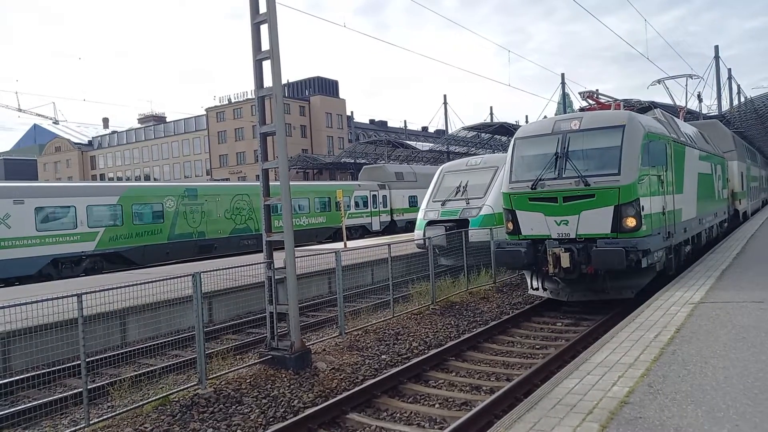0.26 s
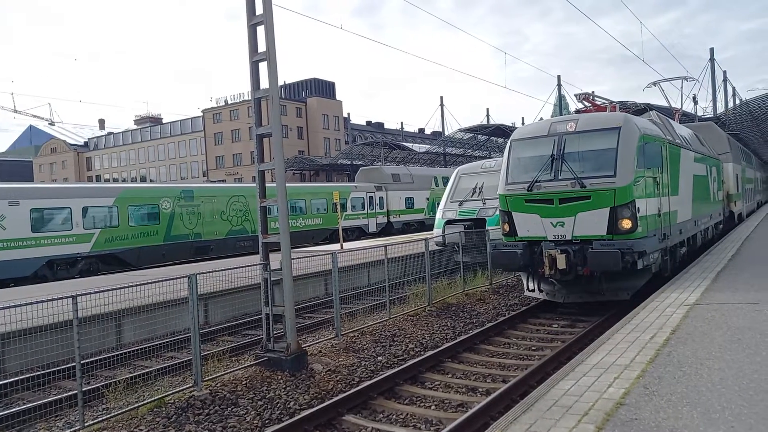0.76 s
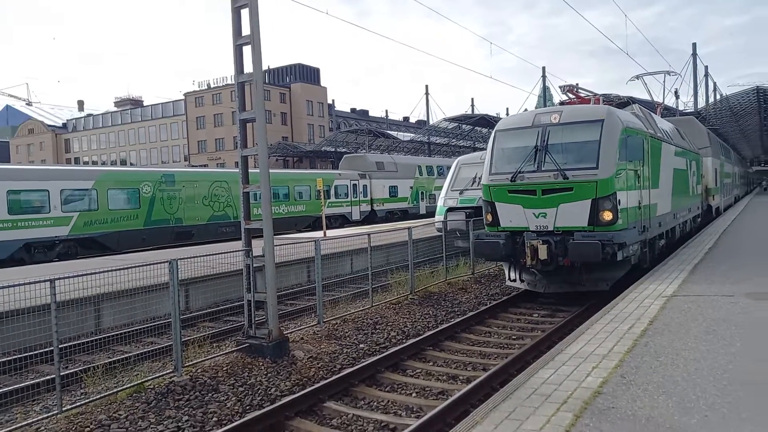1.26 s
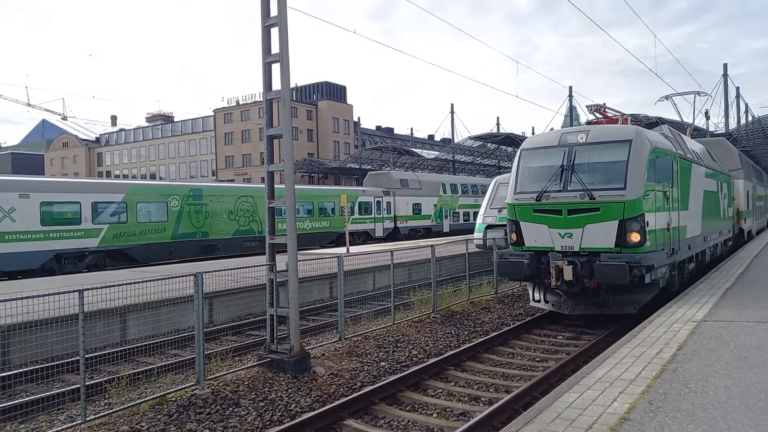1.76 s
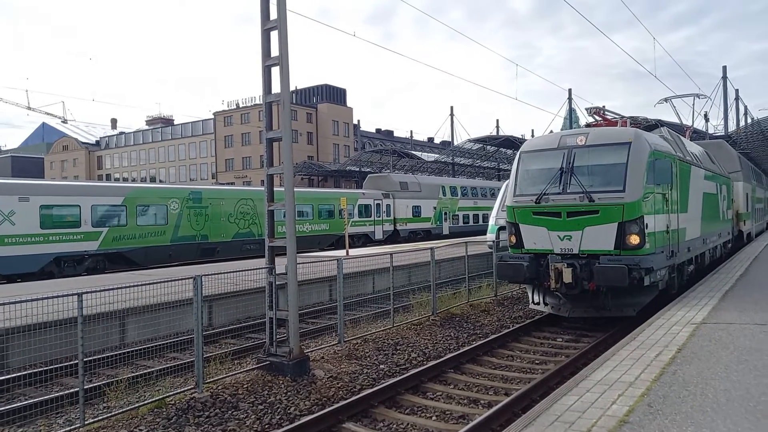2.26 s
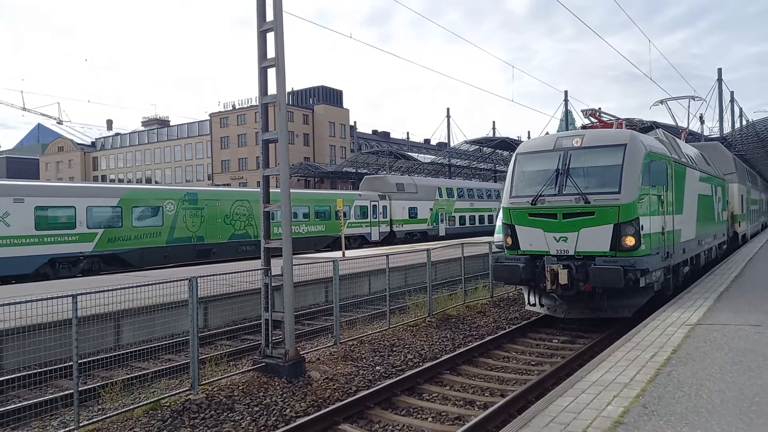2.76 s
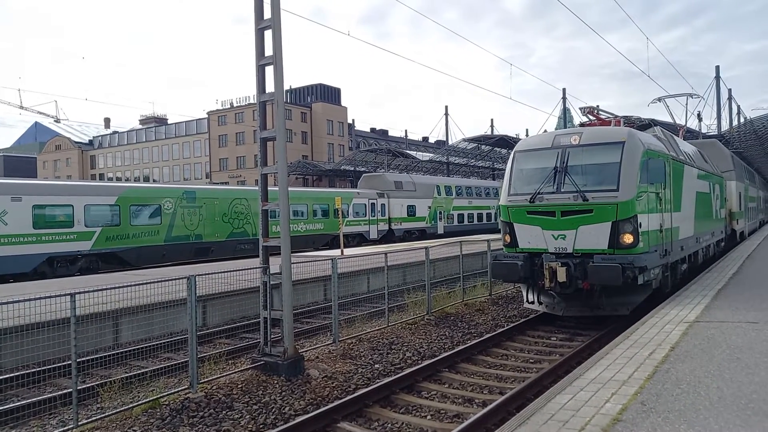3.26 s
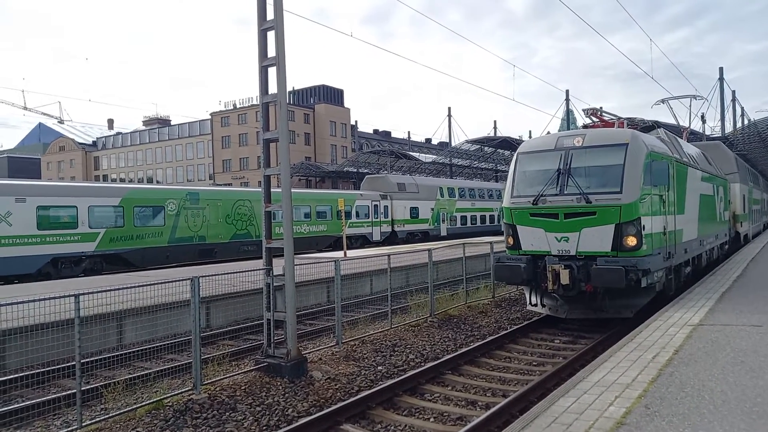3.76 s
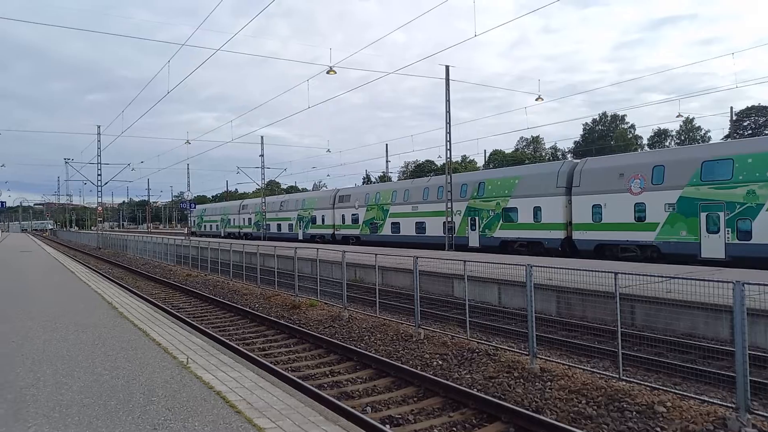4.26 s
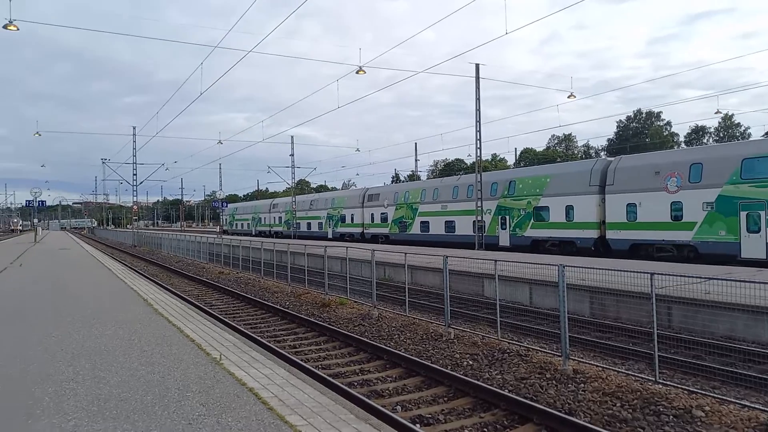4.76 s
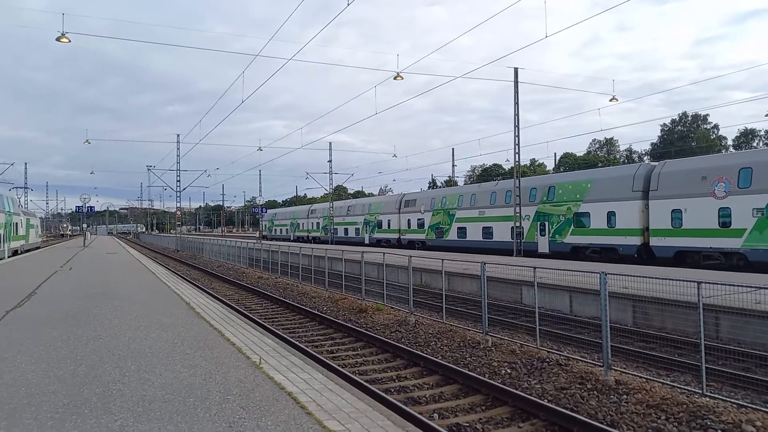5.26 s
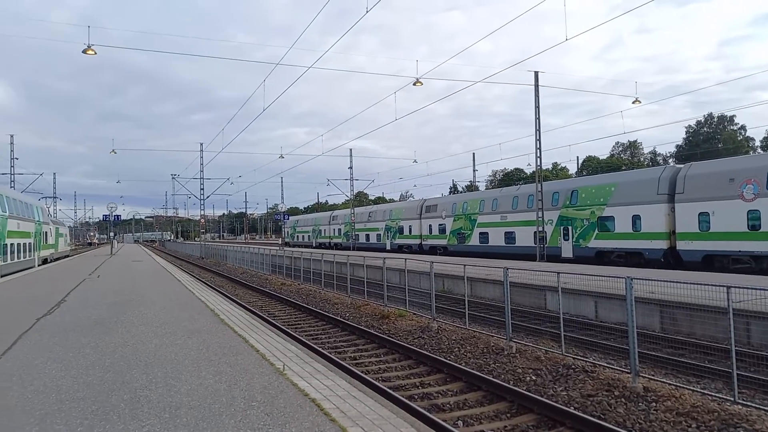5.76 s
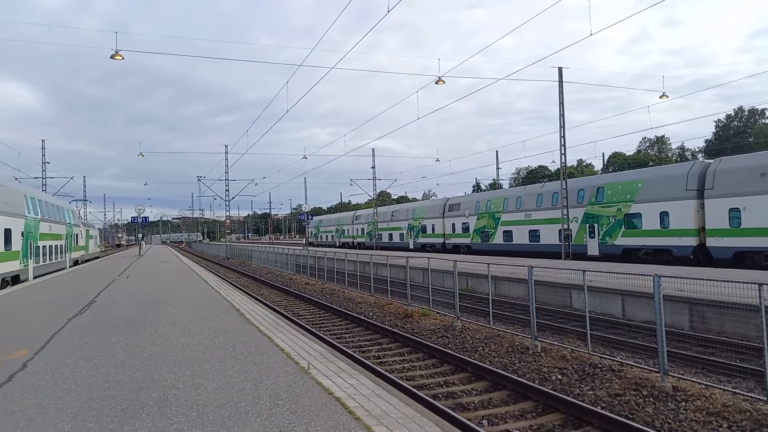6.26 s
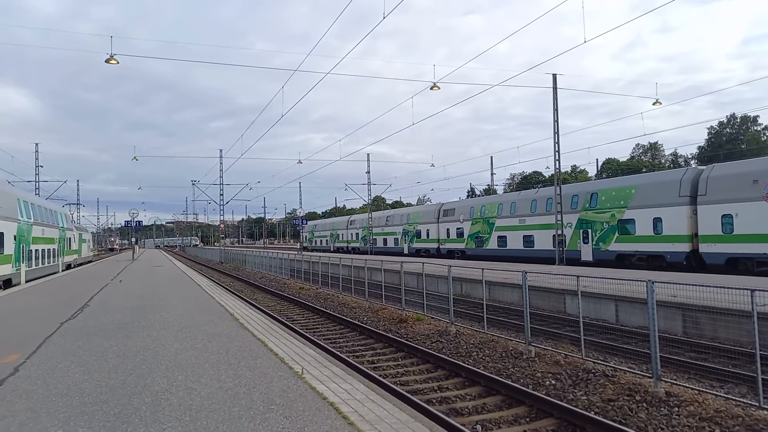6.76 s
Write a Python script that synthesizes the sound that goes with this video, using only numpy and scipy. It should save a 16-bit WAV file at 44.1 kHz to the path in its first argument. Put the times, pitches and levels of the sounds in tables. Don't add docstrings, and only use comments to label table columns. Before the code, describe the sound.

Close at an open-air station platform, an electric locomotive roars steadily with low blowers, a humming body, a wavering compressor tone and soft hiss, with thin high brake squeals over it. Just before four seconds it cuts abruptly to a much quieter place on the platform: wind thumps the left side of the stereo microphone, a distant train rolls and drones with faint high whine, and wheel squeals grow towards the end.

```python
import sys
import numpy as np
from scipy import signal
from scipy.fft import irfft, next_fast_len
from scipy.io import wavfile
from scipy.ndimage import uniform_filter1d

SR = 44100
rng = np.random.default_rng(int(sys.argv[2]) if len(sys.argv) > 2 else 0)


def rack_gain(trim_db):
    fader = np.asarray(trim_db, float)
    return 10 ** (fader / 20)


def log_audio(samples):
    frames = np.atleast_2d(samples).T
    limited = np.clip(frames, -1, 1)
    pcm = np.round(limited * 32767).astype(np.int16)
    wavfile.write(sys.argv[1], SR, pcm)


N = 309582
T = np.arange(N) / SR
SCENE_CHANGE_S = 3.918
PORT_LAG_S, PORT_GAP_M = 0.0004616, 0.17


def on_log(table, f):
    hz, value = np.transpose(table)
    return np.interp(np.log(f + 1), np.log(hz), value)


def colour(table, edge_db=-30):
    (low_hz, low_db), (high_hz, high_db) = table[0], table[-1]
    closed = [(low_hz * 0.52, low_db + edge_db), *table, (high_hz * 1.57, high_db + edge_db)]
    return lambda f: rack_gain(on_log(closed, f))


def split(table, hz):
    cut = next(k for k, (f, _) in enumerate(table) if f > hz)
    return table[:cut + 1], table[cut:]


def columns(table, t):
    s, *cols = np.transpose(table)
    return [np.interp(t, s, c) for c in cols]


def ring(hz, width):
    return lambda f: 1 / (1 + (2 * (f - hz) / width) ** 2)


def walk(rate, n=N):
    hold = int(SR / min(rate, 60))
    steps = np.repeat(rng.standard_normal(N // 500)[:n // hold + 1], hold)
    return 1.29 * uniform_filter1d(uniform_filter1d(steps, hold), hold)[:n]


# (f/Hz, level/dB)
RIGHT_PORT_GAIN = [(100, 0), (400, 1.5), (1300, 1.5), (4400, 1.5), (8000, 4)]


def at_ports(gain, n, direct, own=0.13):
    f = np.fft.rfftfreq(2 * next_fast_len(n // 2 + 1), 1 / SR)
    wave, mid, side = rng.standard_normal((3, len(f))) + 1j * rng.standard_normal((3, len(f)))
    alike = np.clip(1 - own / (1 + (f / 160) ** 2), 0, 1) * np.sinc(2 * f * PORT_GAP_M / 343)
    field = mid * np.sqrt((1 + alike) / 2) + np.outer([1, -1], side * np.sqrt((1 - alike) / 2))
    late = np.exp(-2j * np.pi * np.outer([PORT_LAG_S, 0], f))
    share = np.clip(direct, 0, 1)
    both = (np.sqrt(share) * wave * late + np.sqrt(1 - share) * field) * gain(f)
    both = both * rack_gain(np.outer([-.5, .5], on_log(RIGHT_PORT_GAIN, f)))
    middle_power = np.sum(np.abs(both.mean(axis=0)) ** 2)
    return f, both * len(f) / np.sqrt(middle_power / 2)


def hum(gain, n, direct):
    return irfft(at_ports(gain, n, direct)[1])[:, :n]


def roar(table, n, direct, own, swell_db, flicker_db, rate):
    f, both = at_ports(colour(table), n, direct, own)
    octave = np.log2(f + 1)
    swell = swell_db * walk(2.82, n)
    lowest, highest = int(np.log2(table[0][0])) - 1, int(np.log2(table[-1][0])) + 2
    out = 0
    for centre in range(lowest, highest + 1):
        band = irfft(both * np.clip(1 - abs(octave - centre), 0, 1))[:, :n]
        out = out + band * rack_gain(swell + flicker_db * walk(rate, n))
    return out


def tone(hz, db, wander_hz, beat_db, rate=14, lag=PORT_LAG_S):
    turn = 2 * np.pi * np.cumsum(hz + wander_hz * walk(6)) / SR + 2 * np.pi * rng.random()
    left = np.sin(turn - 2 * np.pi * hz * lag) * rack_gain(beat_db * walk(rate))
    right = np.sin(turn) * rack_gain(beat_db * walk(rate))
    return np.sqrt(2) * rack_gain(db) * np.array([left, right])


# (f/Hz, level/dB per Hz)
RUMBLE_COLOUR = [(28, -20), (50, -2.5), (100, -0.5), (170, -3.5), (240, -6), (320, -18.5)]
# (t/s, level/dB, left minus right/dB)
WIND_LEVELS = [(3.93, -32, 4), (3.98, -27, 14), (4.04, -36, -1), (4.1, -23.5, 12), (4.14, -31.5, 9),
               (4.38, -31.5, 8.5), (4.51, -24, 20), (4.56, -32.5, 15), (4.6, -26.5, 0.5), (4.64, -20, 21),
               (4.67, -35, 7), (4.71, -29.5, 13), (4.76, -49, -26), (4.92, -48, -21), (5.02, -37, 1),
               (5.1, -39, -2), (5.13, -49, -13), (5.19, -32, 2), (5.27, -46.5, -10), (5.44, -34.5, -4),
               (5.5, -46, -10), (5.53, -31, -3.5), (5.7, -47, -10), (5.75, -37.5, -1.5), (5.82, -43, -13),
               (5.92, -34, 0.5), (6.11, -44, -3), (6.2, -33, 0), (6.23, -47, 1.5), (6.26, -34.5, 1.0),
               (6.43, -32.5, 0.5), (6.44, -40, 0.5), (6.54, -41, -7), (6.59, -33, 0), (6.73, -37, 1),
               (6.76, -54, -12), (6.81, -36, -2), (6.83, -42, -1.5), (6.91, -34, 0.5), (6.96, -41, -5),
               (7.02, -34, -2.5)]


def wind(n):
    db, pan_db = columns(WIND_LEVELS, T[-n:])
    pan = np.array([pan_db, -pan_db]) * 0.4
    return roar(RUMBLE_COLOUR, n, 0.052, 0.5, 2.6, 1.38, 19) * rack_gain(db + pan)


# (t/s, peak level/dB, f/Hz, glide/octaves, length/s, port 0 left 1 right)
WIND_THUMPS = [
    (3.981, -12, 110, -0.051, 0.011, 0),
    (4.1, -15, 90, -.5, 0.02, 0),
    (4.48, -19, 109, -0.054, 0.016, 0),
    (4.512, -10.5, 120, 0.63, 0.012, 0),
    (4.632, -12, 142, 0.48, 0.024, 0),
    (4.7, -14.5, 166, 0.53, .014, 0),
    (4.606, -25, 105, 0, 0.009, 1),
    (5.539, -24, 90, 0, 0.013, 1),
]


def eddies():
    out = np.zeros((2, N))
    for s, db, hz, glide, length, port in WIND_THUMPS:
        u = (T - s) / length
        turn = 2 * np.pi * hz * (T - s) * 2 ** (glide * np.clip(u, -3, 3) / 4)
        out[int(round(port))] += rack_gain(db) * np.exp(-u ** 2) * np.cos(turn)
    return out


CARRIER_HZ, MOTOR_HZ = 7160, 58.3
# (t/s, rolling level/dB, bogie drone level/dB, whine level/dB)
FAR_LEVELS = [(3.93, -51, -42, -62.5), (4.65, -51, -42.5, -64.5), (4.81, -57, -50, -68.5),
              (4.99, -55.5, -44.5, -62), (5.12, -55, -44.5, -71), (5.47, -57, -49, -69.5),
              (5.55, -55, -44, -78), (5.6, -57, -49.5, -75), (5.89, -55.5, -44, -64), (5.93, -55, -46, -78),
              (6.15, -55, -38.5, -71), (6.19, -54, -55.5, -77), (6.3, -51, -39, -83), (6.41, -53, -40, -75),
              (6.67, -54.5, -45.5, -79), (6.74, -52.5, -52, -72), (6.8, -55.5, -40, -79),
              (6.93, -50, -42, -79), (7.02, -55.5, -45.5, -65)]
# (f/Hz, level/dB per Hz)
ROLLING_COLOUR = [(300, -0.5), (420, -7.5), (700, -14.5), (1000, -16), (1400, -21), (1900, -21.5),
                  (2700, -26), (4000, -30), (6000, -39.5), (7200, -34), (8400, -50.5), (10800, -42.5),
                  (11800, -49), (15700, -65)]
# (multiple of motor f, level/dB)
WHINE_SIDEBANDS = [(-7, -32), (-6, -19), (-4, -19), (-3, -1), (-1, -7), (0, 8.5), (1, -22), (3, -8),
                   (6, -14), (9, -11)]


def far_train(n):
    roll_db, drone_db, whine_db = columns(FAR_LEVELS, T[-n:])
    drone, roll = split(ROLLING_COLOUR, 600)
    roll = roar(roll, n, 0.36, .1, 0.39, 0.63, 8) * rack_gain(roll_db + 1.67)
    drone = roar(drone, n, 0.094, 0.28, 2.3, 1.9, 14) * rack_gain(drone_db + 2.5)
    whine = sum(tone(CARRIER_HZ + k * MOTOR_HZ, db, 2.48, 4.0, 20) for k, db in WHINE_SIDEBANDS)[:, -n:]
    haze = hum(ring(CARRIER_HZ, 800), n, 0.22) * rack_gain(-2.0)
    return roll + drone + (whine + haze) * rack_gain(whine_db - 4.5)


# (t/s, f/Hz, level/dB)
WHISTLE_PATH = [(4.82, 14500, -95), (4.85, 14650, -78), (4.88, 15100, -73), (4.93, 15400, -75),
                (4.97, 15350, -78), (5.01, 15400, -77), (5.06, 15300, -84), (5.1, 15500, -84),
                (5.14, 15100, -78), (5.19, 14700, -95)]


def whistle():
    hz, db = columns(WHISTLE_PATH, T)
    sounding = (T > WHISTLE_PATH[0][0]) & (T < WHISTLE_PATH[-1][0])
    rasp = .4 + uniform_filter1d(rng.standard_normal(N), size=40) * 7.0
    squeak = tone(hz + 250 * walk(50), db - 3.0, 1.5, 3.5)
    return squeak * rasp * sounding * rack_gain(np.array([[3.5], [-2.5]]))


# (start t/s, loudest t/s, end t/s, f/Hz, width/Hz, level/dB)
SQUEAL_EVENTS = [(-.3, 0.069, 0.53, 10150, 230, -58.5), (.55, 0.8, 1.0, 10120, 130, -61),
                 (.95, 1, 1.4, 11000, 80, -63), (1.5, 1.7, 1.9, 13000, 90, -66),
                 (1.85, 1.87, 2.07, 10130, 130, -59), (2.05, 2.3, 2.7, 12000, 100, -70),
                 (-.5, .5, 1.5, 9300, 200, -63.5), (-1, 0.98, 3.1, 4650, 40, -63),
                 (-0.5, 1.0, 4.3, 3630, 44, -64), (-0.2, 2.7, 5.8, 7800, 30, -72.5),
                 (3.98, 4.07, 4.18, 6230, 50, -57), (4.15, 4.38, 4.55, 6220, 30, -73),
                 (4.0, 4.28, 4.6, 7950, 46, -63), (4.35, 4.58, 5.06, 4000, 51, -64),
                 (4.3, 4.63, 4.75, 2374, 46, -57), (4.02, 4.2, 4.85, 13000, 2000, -74),
                 (4.35, 4.45, 4.6, 4950, 60, -70), (4.5, 5, 7.5, 566, 8.4, -55),
                 (4.5, 5.3, 6.8, 2568, 11, -68), (6.2, 7.18, 7.8, 4295, 40, -54),
                 (6.3, 6.87, 7.2, 4405, 40, -56), (6.6, 7.17, 7.3, 4150, 82, -55),
                 (6.25, 6.8, 7.9, 4350, 180, -60), (6.5, 6.77, 6.95, 3450, 32, -62.5),
                 (6.9, 7, 7.1, 3270, 40, -65), (6.35, 6.6, 6.85, 5360, 140, -66),
                 (6.912, 6.924, 6.96, 2200, 900, -51), (6.915, 6.924, 6.945, 11000, 500, -70),
                 (6.55, 6.66, 6.75, 406, 20, -42), (6.75, 6.88, 7.1, 370, 19, -47.5)]


def squeals(first, last):
    out = np.zeros((2, N))
    for start, top, end, hz, width, db in SQUEAL_EVENTS:
        if first <= top * SR < last:
            a, b = max(int(start * SR), first, 0), min(int(end * SR), last, N)
            swell = np.sin(np.interp(T[a:b], [start, top, end], [0, np.pi / 2, np.pi])) ** 1.45
            mode = lambda f: ring(hz, width)(f) + 0.19 * ring(hz, 6 * width)(f)
            length = SR + SR // 2
            if b - a > length:
                length = 3 * length
            noise = hum(mode, length, 0.55)[:, :b - a]
            flutter_db = 2.4 * walk(35, b - a)
            out[:, a:b] += noise * swell * rack_gain(db + flutter_db)
    return out


COMPRESSOR_HZ, BLADE_HZ = 312, 293.8
# (t/s, then level/dB of low roar, cooling air, brake scrape, air leak, compressor)
LOCO_LEVELS = [(0.0, -25.5, -43.5, -49, -57, -25.5), (0.11, -26.5, -42.5, -51, -63, -26.5),
               (0.41, -27, -42.5, -52.5, -62, -28), (0.53, -26.5, -42.5, -52.5, -60, -36),
               (0.92, -27.5, -43.5, -52.5, -61, -29), (1.22, -27.5, -43, -54.5, -65.5, -31),
               (1.57, -27, -43, -55, -65, -40.5), (1.68, -28.5, -42.5, -56.5, -64, -33),
               (2.01, -26, -43.5, -54.5, -62.5, -37), (2.32, -25.5, -43.5, -54.5, -60, -41),
               (2.47, -26, -44, -57, -63, -48), (2.86, -27, -43, -55, -61, -34.5),
               (3.54, -28, -42.5, -56, -63, -39), (3.72, -27, -42.5, -55, -61, -34),
               (3.91, -26.5, -42.5, -56, -62.5, -45)]
# (f/Hz, level/dB per Hz)
BLOWER_COLOUR = [(28, -31), (50, -0.5), (140, -3), (175, -7.5), (250, 0.0), (310, -4), (340, -9),
                 (420, -12), (540, -21.5), (800, -14), (1000, -24), (1500, -26), (2400, -27.5),
                 (3000, -35.5)]
# (f/Hz, level/dB per Hz)
HISS_COLOUR = [(3000, -1.5), (4600, -1.5), (5800, -11), (7200, -11), (8600, -22.5), (10000, -12.5),
               (12000, -5.5), (13200, -17), (15700, -28)]
# (f/Hz, width/Hz, level/dB)
BODY_HUMS = [(101.3, 7.2, -37.5), (194.9, 8.4, -40.5), (218.5, 8.9, -38.5), (248.2, 12.7, -35.5),
             (296.2, 9.1, -39), (376.7, 16.4, -43), (404.8, 8.7, -48.5), (712, 22, -55.5), (800, 60, -55),
             (2226, 140, -57)]
# (multiple of blade f, level/dB)
BLADE_TONES = [(2, -44.5), (3, -58), (6, -59.5)]


def locomotive(n):
    low_db, air_db, scrape_db, leak_db, pump_db = columns(LOCO_LEVELS, T[:n])
    low, air = split(BLOWER_COLOUR, 500)
    scrape, leak = split(HISS_COLOUR, 8000)
    low = roar(low, n, 0.065, 0.24, 0.37, 1.0, 8.98) * rack_gain(low_db - 1.5)
    air = roar(air, n, .3, .1, .4, 0.46, 7.02) * rack_gain(air_db + 0.9)
    scrape = roar(scrape, n, 0.12, .1, 0.37, 0.65, 10) * rack_gain(scrape_db + 0.55)
    leak = roar(leak, n, 0.27, .1, .4, 0.65, 8.8) * rack_gain(leak_db + 1.0)
    body = sum(hum(ring(hz, width), n, 0.17) * rack_gain(db) for hz, width, db in BODY_HUMS)
    body = body * rack_gain(low_db + 26.5)
    blades = sum(tone(k * BLADE_HZ, db, 0.604, 2.6) for k, db in BLADE_TONES)[:, :n]
    pump = tone(COMPRESSOR_HZ, 0, 2.5, 2.6, lag=0.00016)[:, :n] * rack_gain(1.38 * (pump_db + 30.5) - 32)
    return low + air + scrape + leak + body + blades + pump


def scene():
    change = int(SCENE_CHANGE_S * SR)
    rest = N - change
    beds = np.concatenate([locomotive(change), far_train(rest) + wind(rest)], axis=1)
    return beds + squeals(-N, change) + squeals(change, 2 * N) + whistle() + eddies()


def low_pass(x):
    return signal.sosfilt(signal.butter(12, 15690, fs=SR, output="sos"), x)


def record(dry):
    mix = signal.sosfilt(signal.butter(2, 32, "high", fs=SR, output="sos"), dry)
    return low_pass(mix)


dry = scene()
out = record(dry)
log_audio(out)
```